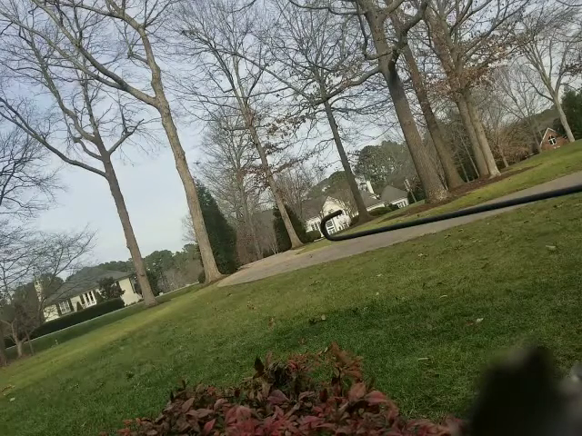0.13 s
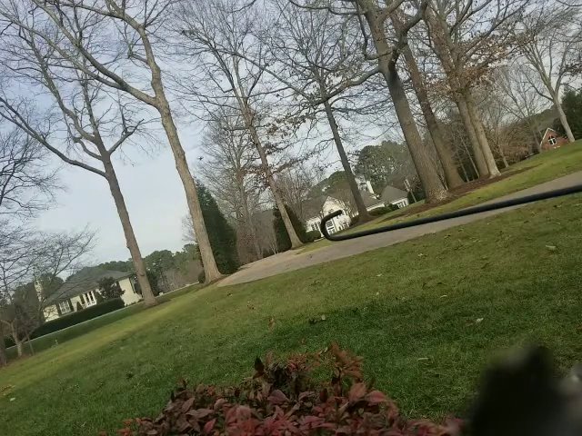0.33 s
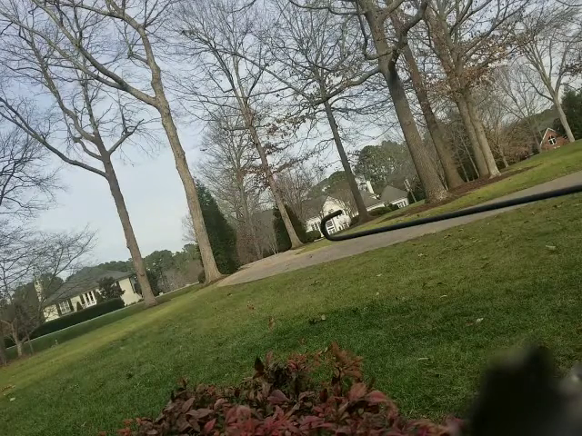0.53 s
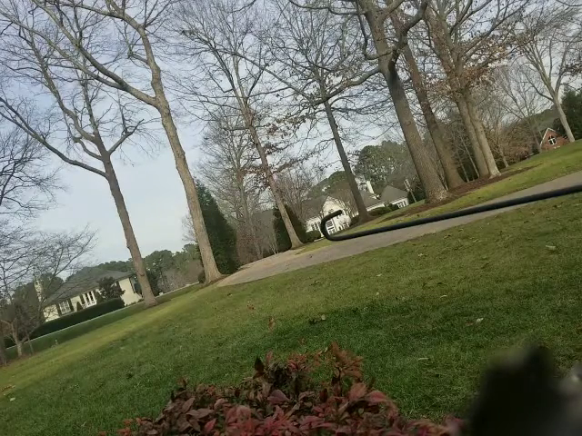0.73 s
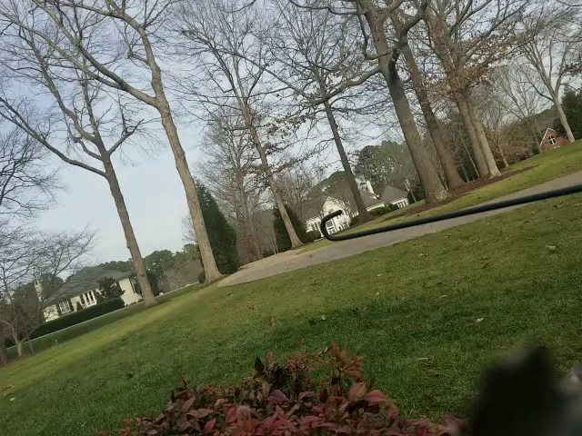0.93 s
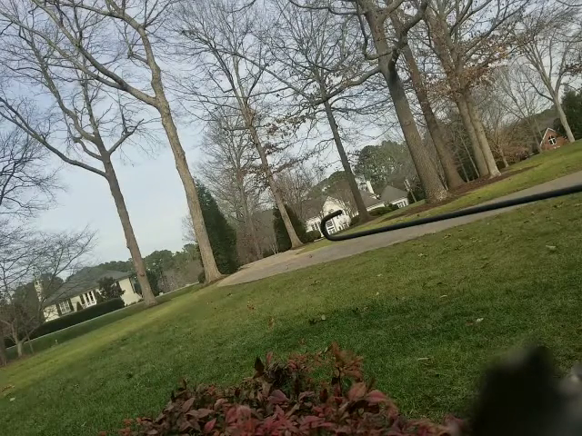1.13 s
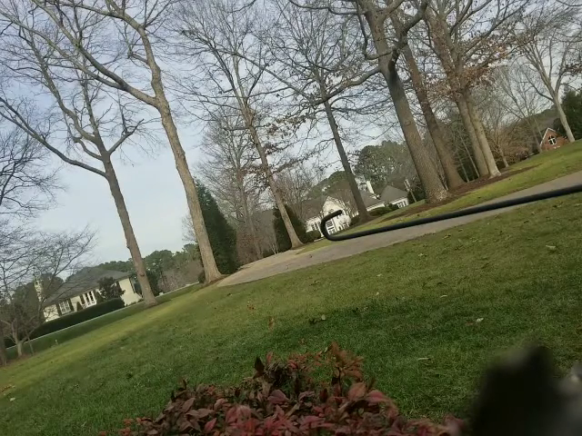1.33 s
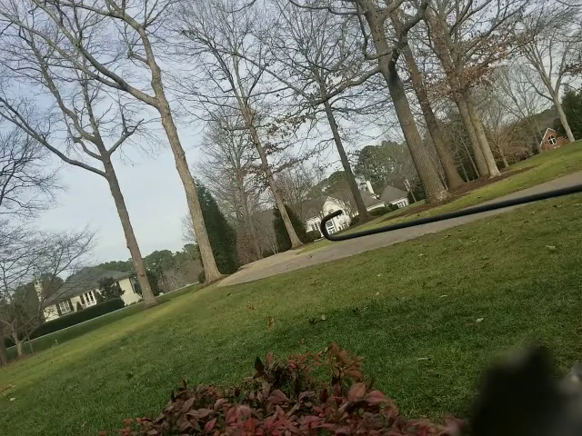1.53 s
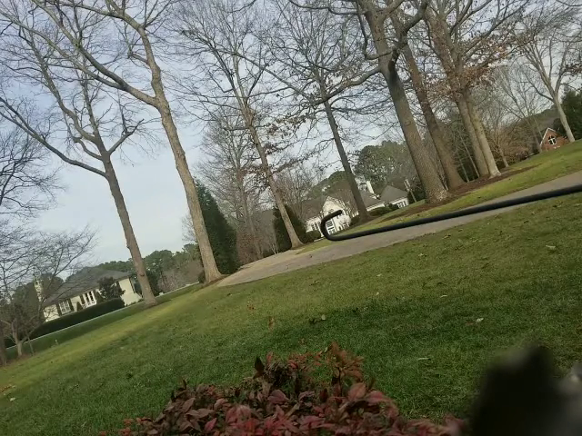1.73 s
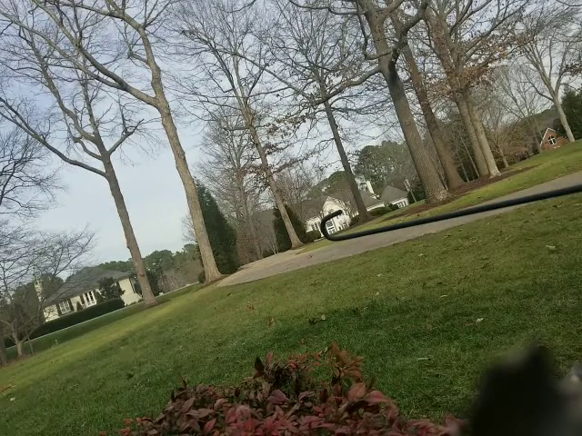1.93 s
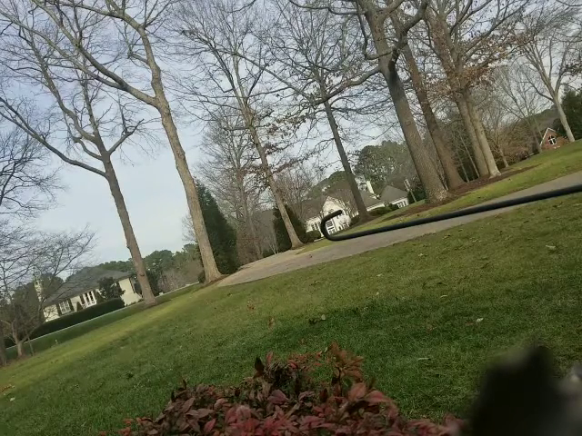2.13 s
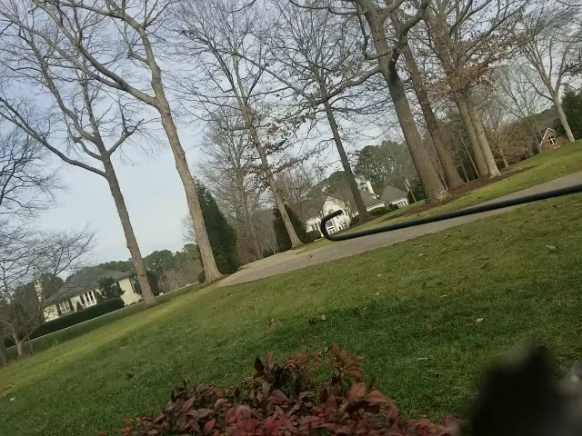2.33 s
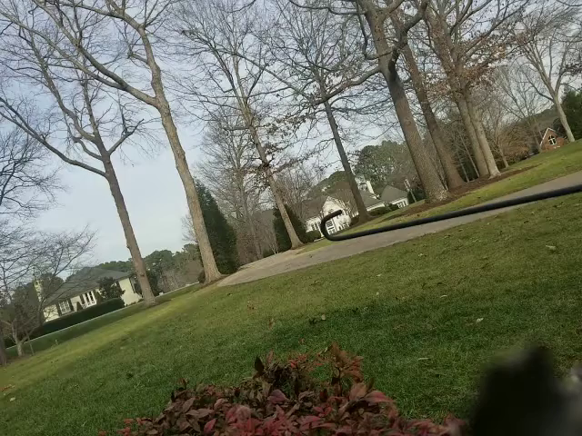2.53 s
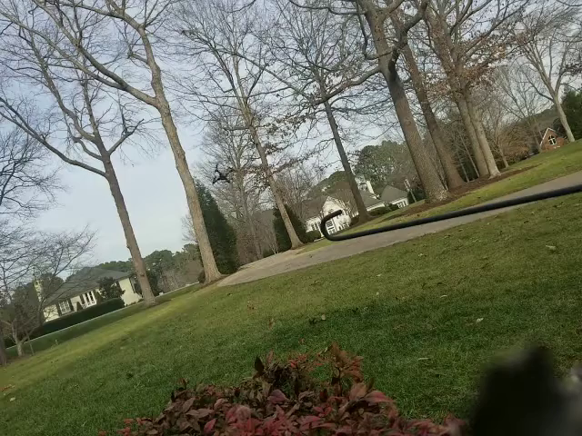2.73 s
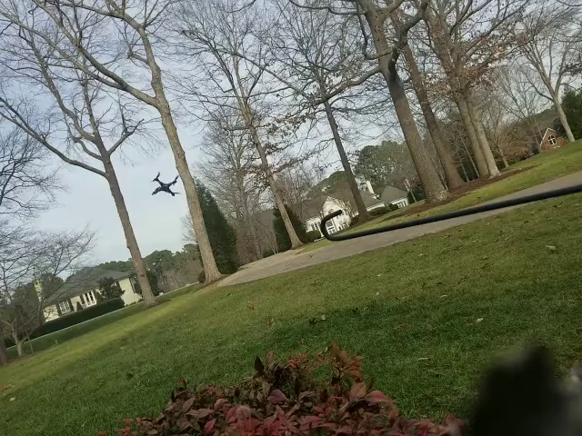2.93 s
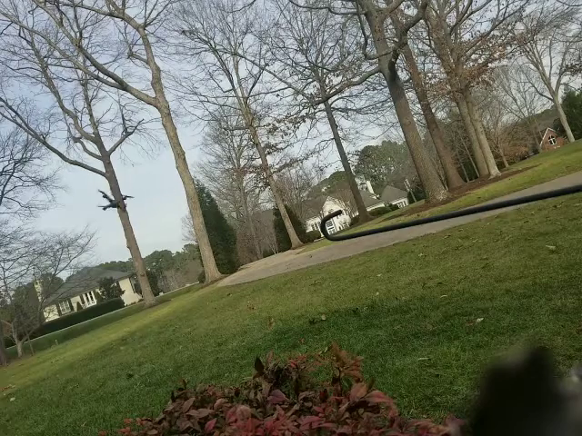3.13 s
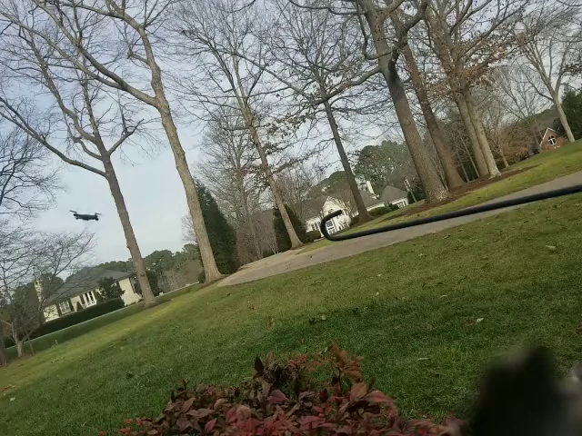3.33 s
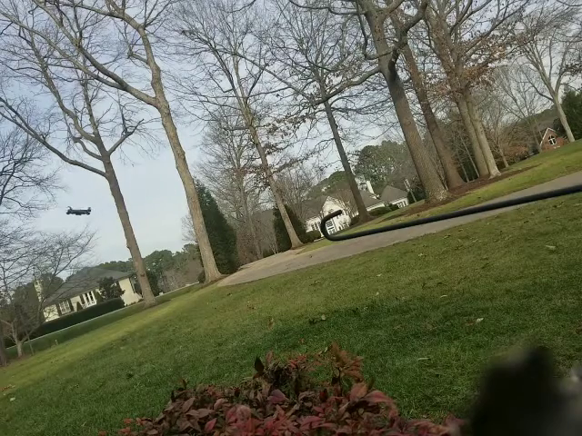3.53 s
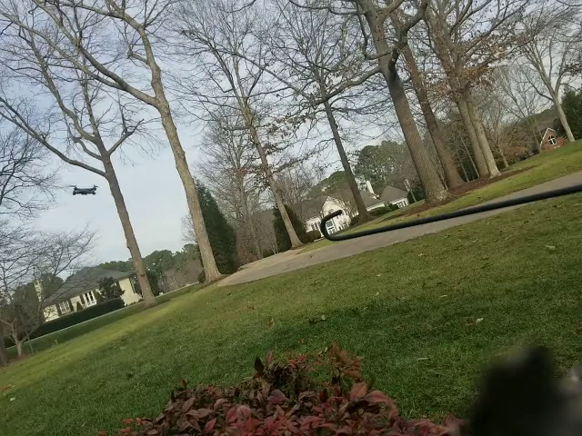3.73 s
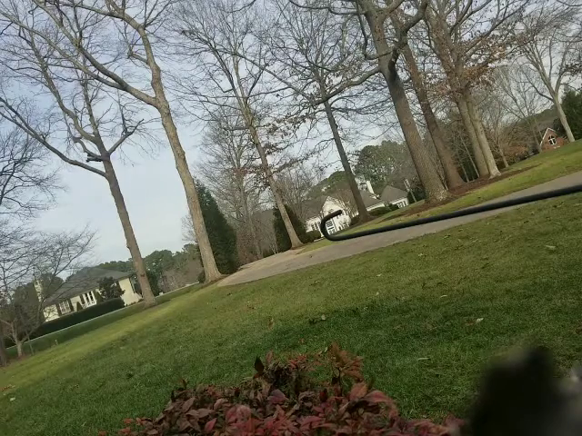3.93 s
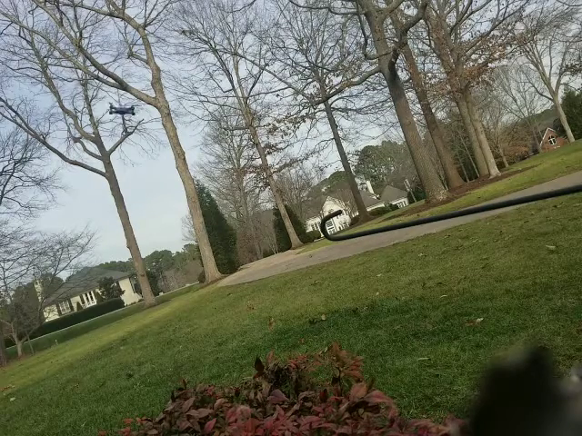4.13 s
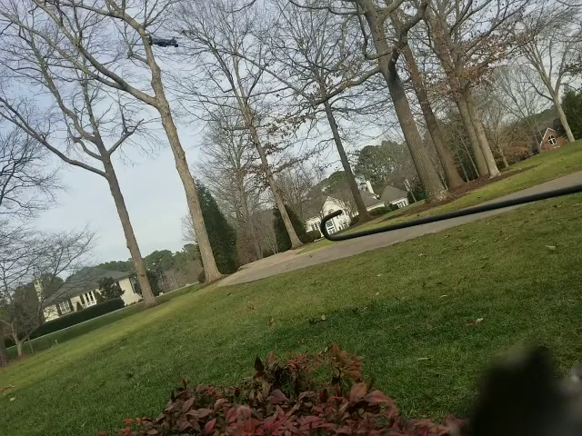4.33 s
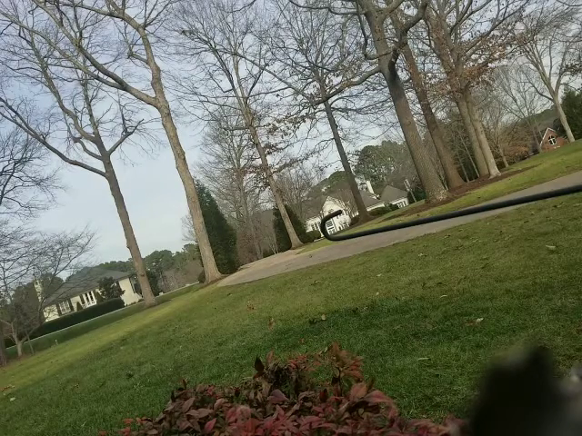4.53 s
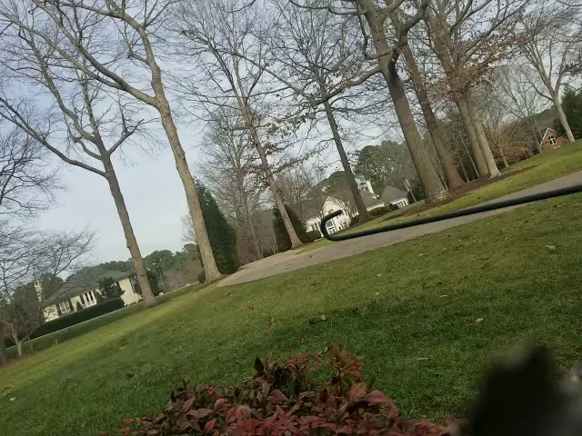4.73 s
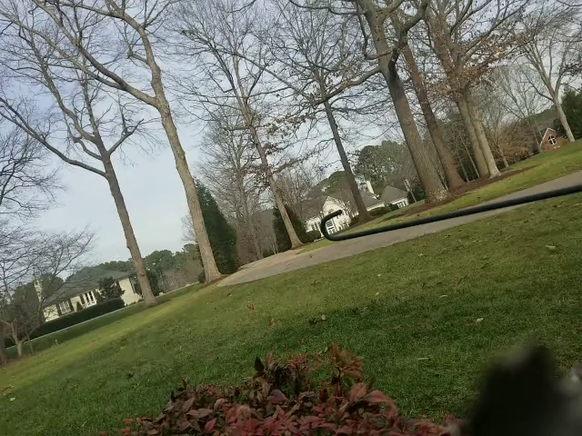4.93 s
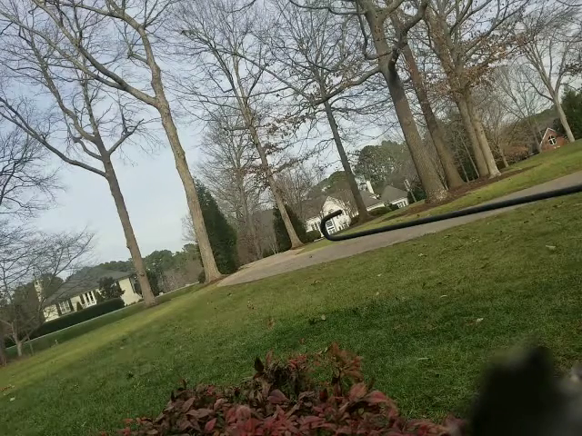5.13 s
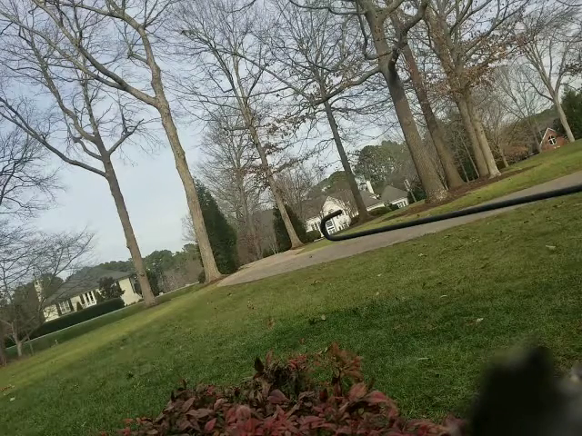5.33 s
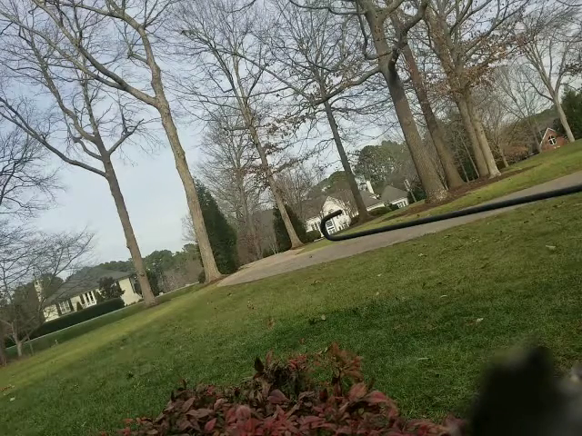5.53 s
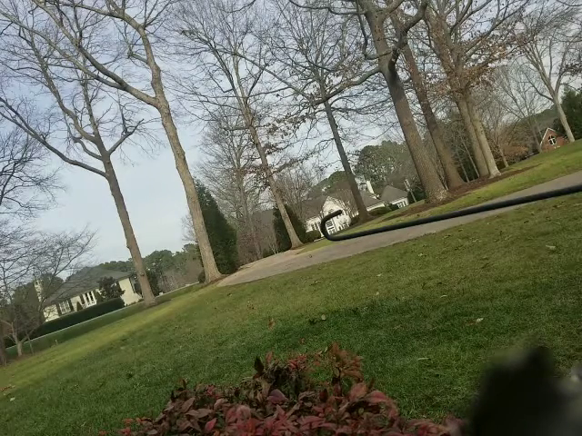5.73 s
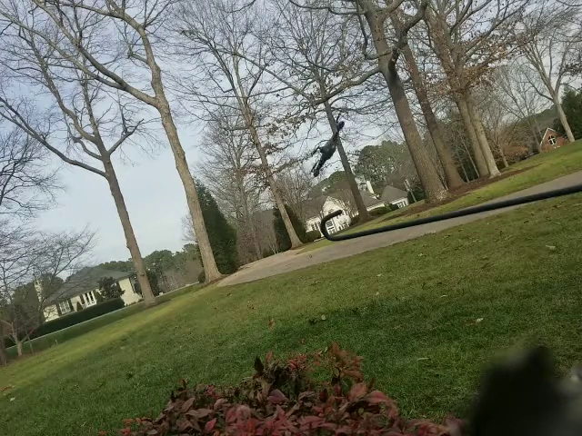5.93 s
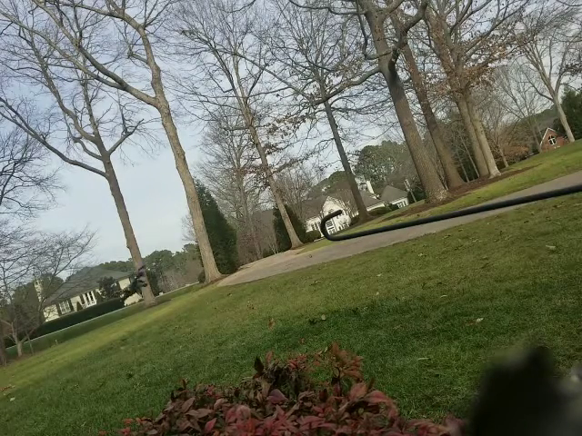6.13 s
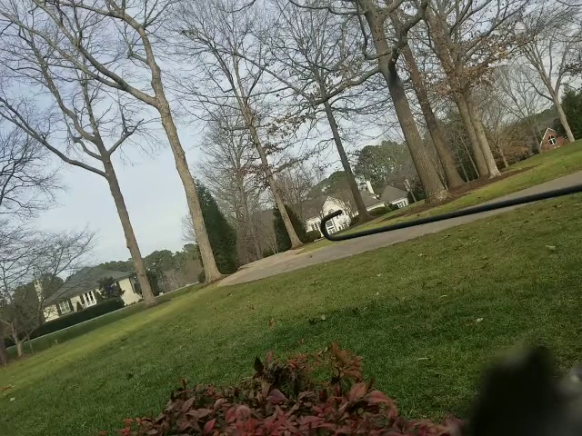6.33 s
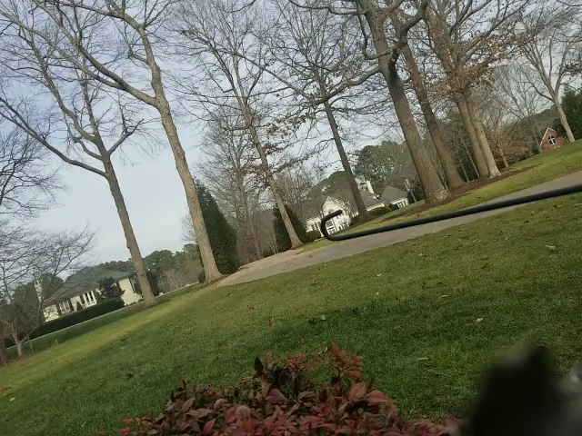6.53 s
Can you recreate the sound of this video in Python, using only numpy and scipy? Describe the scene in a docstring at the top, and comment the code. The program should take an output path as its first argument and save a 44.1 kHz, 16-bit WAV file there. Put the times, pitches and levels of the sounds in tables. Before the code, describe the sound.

High, buzzy whines from a little four-rotor drone swoop up and down over a lawn, growing closer and harsher, with distant low traffic beneath.

```python
"""Whines climbing and diving from four geared motors: a toy quadcopter swoops about a lawn, a few
metres from two microphones. Each gear pair is an oscillator at its tooth rate with sidebands and overtone.
Filtered noise makes the rattle, blade-tip hiss, downwash and panel buzz; blade-rate cosines make the hum.
The ground returns a delayed copy, trees and walls scatter the air noise, distant traffic rumbles below."""
import sys
import numpy as np
from scipy import signal
from scipy.fft import rfft, irfft
from scipy.io import wavfile
from scipy.ndimage import uniform_filter1d, map_coordinates

SR = 44100
rng = np.random.default_rng(int(sys.argv[2]) if len(sys.argv) > 2 else 0)


def wav_out(sig):
    """Save sig, one row per channel (or a flat mono array), as 16-bit PCM at SR to the path in sys.argv[1]."""
    wavfile.write(sys.argv[1], SR, np.round(np.clip(np.atleast_2d(sig).T, -1, 1) * 32767).astype(np.int16))


def elevation(decibels):
    """Turn decibel levels (scalar or array-like) into linear amplitude ratios."""
    levels = np.asarray(decibels, float)
    return 10 ** (levels / 20)


N = 294147
TIME_S = np.arange(N) / SR
FREQ_HZ = np.fft.rfftfreq(N, 1 / SR)
TEETH_PER_BLADE_PASS = 27


def unit(x):
    """Scale to rms 1."""
    return x / np.sqrt(np.mean(x ** 2))


def curves(table):
    """Columns of a (t/s, value, ..) table, interpolated at every sample."""
    t_s, *columns = np.transpose(table)
    return [np.interp(TIME_S, t_s, column) for column in columns]


def walk(rate_hz):
    """Smooth random walk about zero, changing about rate_hz times a second, rms 1."""
    width = max(int(SR / rate_hz), 1)
    smooth = uniform_filter1d(rng.standard_normal(N), width)
    return unit(uniform_filter1d(smooth, width))


def delay(x, ms):
    """Moving propagation delay: read the sound at interpolated places."""
    return map_coordinates(x, [np.arange(N) - ms * SR / 1000], order=3, mode="nearest")


def colour(x, spectrum, lo_hz=0., hi_hz=1e6, power=0.99):
    """Filter by (f/Hz, level/dB) points, dB scaled by power, between steep band edges."""
    hz, db = np.transpose(spectrum)
    f = FREQ_HZ + 1
    edges = 1 / np.sqrt((1 + (lo_hz / f) ** 16) * (1 + (f / hi_hz) ** 16))
    gain_db = power * np.interp(np.log(f), np.log(hz), db)
    return irfft(rfft(x) * elevation(gain_db) * edges, N)


def resonances(modes, lift_db=False):
    """Sum of resonance peaks over (f/Hz, width/Hz, level/dB) modes; lift_db: peaks above a flat 0 dB."""
    floor = 1 if lift_db else 0
    return floor + sum((elevation(db) - floor) / (1 + (2 * (FREQ_HZ - hz) / width) ** 2)
                       for hz, width, db in modes)


# airframe spectrum, before colour's power: f/Hz, level/dB
AIRFRAME = [(250, -14), (600, -16), (800, -18.5), (950, -19.5), (1800, -11), (3300, -4.5), (5400, -6.5),
            (7200, 8), (9400, -7), (12700, 1), (14500, -4)]
# plastic shell modes: f/Hz, width/Hz, lift/dB
SHELL_MODES = [(1156, 457, 12), (2197, 350, 4.5), (2600, 63, 4), (3400, 28, 2.5), (7060, 580, -2)]


def airframe(x, lo_hz=0., hi_hz=1e6):
    """The airframe colours the sound, and its plastic shell lifts the bands where it rings."""
    return irfft(rfft(colour(x, AIRFRAME, lo_hz, hi_hz)) * resonances(SHELL_MODES, lift_db=True), N)


# one speed curve per rotor: t/s, tooth rate f/Hz, level/dB re gear rattle before trim and colouring
ROTORS = [
    [(0, 2960, -16), (.1, 3200, -13), (.2, 3750, -10), (.27, 4100, -7), (.36, 4480, -2), (.52, 4680, 0),
     (.66, 4870, -4), (.8, 4945, -6), (1.2, 5050, -5), (1.57, 5270, -4), (1.63, 4750, -10), (1.8, 3250, -8),
     (1.9, 3150, -16), (2.12, 3200, -16), (2.18, 3330, -3), (2.24, 4250, 0), (2.29, 4530, -2),
     (2.38, 4640, -6), (2.5, 4707, -14), (2.68, 4780, -5), (2.81, 4840, 1), (2.9, 4893, 0),
     (3.02, 4917, -6), (3.15, 4910, -12), (3.4, 4930, -7), (3.52, 4990, -9), (3.65, 5130, -7),
     (3.76, 5160, -4), (4.1, 5190, -6), (4.36, 5240, -8), (4.5, 5300, -8), (4.62, 5326, -6.5),
     (4.9, 3212, -24), (5.1, 3200, -12), (5.18, 3380, -8), (5.23, 3800, -24), (5.4, 4800, -22),
     (5.55, 5050, -6), (5.7, 5132, -0.5), (6.1, 5096, -18), (6.67, 4663, -20)],
    [(0, 4730, -14), (.15, 4960, -7), (.34, 5050, -6), (.42, 5050, -14), (.6, 5060, -7), (.9, 4780, -5),
     (1.5, 4900, -7), (1.75, 4460, -25), (2.6, 4600, -25), (2.8, 4590, -7), (3.05, 4520, -9),
     (3.2, 4450, -20), (3.4, 4500, -16), (3.48, 4510, -4), (3.65, 4460, -8), (3.76, 4510, -3),
     (3.88, 4570, -1), (4.1, 4620, -5), (4.22, 4690, -8), (4.36, 4670, -7), (4.47, 4850, -5),
     (4.6, 4750, -20), (4.68, 4500, -6), (4.77, 4050, -2), (4.85, 3700, -8), (4.95, 3500, -20),
     (5.3, 4654, -9.5), (5.75, 4930, -1), (5.85, 4960, -4), (5.93, 4980, -15), (6.06, 5010, -6),
     (6.16, 4980, -16), (6.67, 4637, -22)],
    [(0, 3220, -22), (.18, 3500, -12), (.32, 3950, -8), (.7, 4330, -10), (.85, 4450, -20), (1.02, 4680, -9),
     (1.15, 4650, -10), (1.25, 4637, -6), (1.58, 4590, -12), (1.8, 3550, -10), (2.1, 3270, -20),
     (2.25, 3940, -12), (2.45, 4050, -20), (2.9, 4340, -9.5), (3.2, 4383, -18), (3.45, 4050, -14),
     (3.6, 3990, -9), (3.76, 3880, -10), (3.9, 3950, -22), (4.45, 4300, -14), (4.54, 4400, -3),
     (4.63, 4760, 0), (4.72, 4760, -2), (4.8, 4280, -2), (4.89, 3600, -14), (5.13, 1900, -10),
     (5.17, 2250, -2), (5.23, 2950, -2), (5.27, 3100, -10), (5.4, 3550, -11), (5.5, 3720, -5),
     (5.6, 3880, -1), (5.7, 3930, 0), (5.8, 4150, 1), (5.87, 4380, -2), (5.95, 4450, -5), (6.03, 4520, -9),
     (6.1, 4550, -22), (6.28, 4580, -20), (6.34, 4530, -3), (6.45, 4300, 2), (6.55, 4210, 2),
     (6.67, 4050, 1)],
    [(0, 5020, -22), (.6, 5190, -26), (1.45, 5535, -24), (1.75, 4860, -26), (2.4, 5900, -26),
     (2.55, 6030, -12), (2.7, 5860, -7), (2.8, 5800, -9), (2.86, 5570, -15), (2.93, 5700, -9),
     (3.02, 5920, -11), (3.08, 5800, -26), (3.5, 5264, -44), (4.58, 5640, -32), (5.1, 3330, -24),
     (5.4, 3205, -20), (5.55, 3400, -9), (5.7, 3700, -20), (5.8, 4050, -10), (5.85, 4000, -1),
     (5.91, 3800, -2), (5.97, 4000, -5), (6.05, 3800, -14), (6.13, 3800, -4), (6.22, 4250, -4),
     (6.27, 4350, -20), (6.67, 4250, -20)],
]
# whine sidebands one, two and three blade rates below the tooth tone:
# multiple of motor shaft rate, level/dB re whine
SIDEBANDS = [(24 / 3, -9), (25 / 3, -8), (26 / 3, -8)]
# fifth shaft order of each motor at cruise: level/dB re whine
FIFTH_ORDER_DB = [-8, -12, -12, -3]


def rotor(table, fifth_db, rattle_db):
    """Gear whine at the tooth rate; returns tone, blade phase and weight for sharing out the hum."""
    cruise_hz, chatter_below_hz, low_speed_hz = 5000, 3900, 4150
    hard_pull_hz_per_s, coast_hz_per_s = 3000, 5000
    pinion_teeth, trim_db = 9, 4.5
    hz, whine_db = curves(table)
    whine_db = whine_db + rattle_db
    hz = uniform_filter1d(hz, size=2200)  # inertia rounds each change of speed
    # slow or coasting gears lose load and chatter; slower falls stay loaded, climbs stay clean
    climb = np.gradient(hz) * SR / hard_pull_hz_per_s
    coast = np.maximum(-climb - coast_hz_per_s / hard_pull_hz_per_s, 0)
    slow = np.clip((chatter_below_hz - hz) / 500, 0, .7)
    slack = np.clip(slow - np.maximum(climb, 0) + coast, 0, .6)
    hz = hz * (1 + 0.00146 * walk(38.9) + 0.0297 * slack * walk(146.9))
    tooth = 2 * np.pi * np.cumsum(hz) / SR + 2 * np.pi * rng.random()

    wear = elevation(1.7 * walk(19)) + 0.43 * walk(1010)  # uneven teeth: a noisy skirt round the tone
    tone = np.cos(tooth)
    fifth_db = fifth_db + 8 * (hz - cruise_hz) / 1000  # +8 dB per kHz
    for order, db in SIDEBANDS + [(5, fifth_db)]:
        flicker_db = 2 * walk(8.6)
        tone = tone + elevation(db + flicker_db) * np.cos(order * tooth / pinion_teeth)
    # octave swells in climbs, more so from low speed, and blurs in hard pulls
    swell_db = 5 + 8 * np.maximum(low_speed_hz - hz, 0) / 1000
    octave_db = -15 + swell_db * np.clip(climb, 0, 1)
    blur_rad = .45 * np.clip(climb, 0, 3) * walk(350)
    tone = tone + elevation(octave_db) * np.cos(2 * tooth + blur_rad)

    # hum strongest near cruise: -9 dB per kHz away from it
    hum_weight = elevation(0.49 * whine_db - 9 * np.abs(hz - cruise_hz) / 1000)
    return elevation(whine_db + trim_db) * wear * tone, tooth / TEETH_PER_BLADE_PASS, hum_weight


# third rotor's undertone as it first spins up: t/s, level/dB re rattle
UNDERTONE = [(0, -7.5), (.2, -12), (.33, -18), (.45, -50), (6.67, -50)]


def undertone(blade_phase, rattle_db):
    """Subharmonic at half the tooth rate."""
    level_db = rattle_db + curves(UNDERTONE)[0]
    return elevation(level_db) * np.cos(blade_phase * TEETH_PER_BLADE_PASS / 2)


def air_noise(chop, rattle_db, wash_db, hiss_db):
    """Downwash, gear rattle and blade-tip hiss: noise bands pulsed by blade passes, fluttering."""
    gust_db = 0.33 * walk(1.4)
    layers = [(wash_db + 1.32 * walk(4.4), 230., 1000.),
              (rattle_db, 1020., 5500.),
              (hiss_db, 5500., 16000.)]
    out = 0
    for db, lo_hz, hi_hz in layers:
        flutter_db = gust_db + 1.3 * walk(35)
        noise = airframe(chop * rng.standard_normal(N), lo_hz, hi_hz)
        out = out + elevation(db + flutter_db) * unit(noise)
    return out


# rumble spectrum, before colour's power: f/Hz, level/dB
TRAFFIC = [(15, -29), (25, -9.5), (70, 5.5), (216, -10.5), (377, -19.5), (518, -19), (561, -47), (600, -60),
           (780, -73), (1320, -120)]


def traffic():
    """Low distant rumble: filtered noise, mostly alike at both microphones."""
    mid, side = (unit(colour(rng.standard_normal(N), TRAFFIC)) for _ in range(2))
    return elevation(-54) * (mid + elevation(-9.5) * side * np.array([[1], [-1]]))


# blade hum, loudest in hard turns: t/s, then level/dB re rattle of blade rate, 2nd and 3rd harmonic
# (each shared among the rotors)
HUM = [(0, -41, -23, -27.5), (2.3, -28, -22.5, -21.5), (2.7, -15.5, -9.5, -27), (3.25, -14, -13.5, -19),
       (3.4, -26, -28, -32), (4.2, -18.5, -24, -32), (4.62, -8, -20, -21), (4.85, -16.5, -28, -48),
       (5.3, -26.5, -27, -23), (5.7, -9, -32, -26), (6.1, -15, -21, -24), (6.35, -10.5, -18, -21),
       (6.67, -17.5, -14, -25)]


def blade_hum(blades, weights, rattle_db):
    """Blade-pass rate and two overtones, shared among the rotors by weight."""
    shares = np.array(weights) / np.sqrt(np.sum(np.square(weights), axis=0))
    gains = [elevation(rattle_db + db) for db in curves(HUM)]
    return sum(share * sum(gain * np.cos(k * phase) for k, gain in enumerate(gains, 1))
               for share, phase in zip(shares, blades))


# loose panel modes: f/Hz, width/Hz, level/dB
BUZZ_MODES = [(2647, 120, 3), (3310, 610, 3.5)]
# panel buzz, strongest while the motors run slow: t/s, level/dB re rattle
BUZZ = [(0, -39), (2.45, -40), (2.75, -31), (2.9, -9), (3.05, -4), (3.25, -28), (4.5, -11), (4.68, -5),
        (4.9, 0), (5.1, -1), (5.25, 2), (5.52, -1), (5.7, -6.5), (5.95, -10), (6.12, -3), (6.3, -8.5),
        (6.67, -20)]


def panel_buzz(rattle_db):
    """Loose panels: noise ringing in their modes, with a grainy level."""
    ring = irfft(rfft(rng.standard_normal(N)) * resonances(BUZZ_MODES), N)
    return elevation(rattle_db + curves(BUZZ)[0] + 1.3 * walk(32)) * unit(ring)


# craft bearing, smoothed in use: t/s, left-microphone lateness re right/ms
BEARING = [(0, -.043), (1.9, -.01), (2.55, .065), (3.35, -.15), (4.15, -.14), (4.5, -.08), (5, .16),
           (5.58, .345), (5.86, .3), (6.3, -.14), (6.67, -.29)]
# ground bounce, later when the craft is high, smoothed in use: t/s, mean lateness re direct/ms, level/dB
BOUNCE = [(0, 1.69, -3), (1, 2, -4.5), (1.85, 2.94, -5), (2.5, 2, -7), (3.2, 2.54, -7.5),
          (3.65, 2.42, -6.5), (4.05, 2.95, -16), (4.45, 3.8, -8.5), (6.15, 2.46, -44), (6.4, 1.55, 2),
          (6.67, 1.36, -22)]


def at_microphones(craft, scatter):
    """Direct path, ground bounce and scattered air noise at the left, then the right microphone."""
    swing_s = .25  # limits how fast the craft changes course
    lag_ms, bounce_ms, bounce_db = (uniform_filter1d(c, int(swing_s * SR), mode="nearest")
                                    for c in curves(BEARING) + curves(BOUNCE))
    out = []
    for side in (1, -1):
        heard = delay(craft, side * lag_ms / 2)
        heard = heard + elevation(bounce_db) * delay(heard, bounce_ms + side * .08)
        heard = heard + elevation(-5.5) * scatter()
        # camera body shades the far microphone, more so in the treble
        treble = colour(heard, [(100, 0), (10000, 0)], lo_hz=3500.0)
        level_db = side * (0.4 - 0.85 * lag_ms)
        treble_db = -side * 4.9 * lag_ms
        out.append(elevation(level_db) * (heard + (elevation(treble_db) - 1) * treble))
    return np.array(out)


# craft loudness as throttle and distance change: t/s, rattle level/dB,
# then downwash and blade-tip hiss level/dB re rattle, both trimmed per path
FLIGHT = [(0, -53, -8.5, -0.5), (1, -55, -27, 1.5), (1.7, -51, -13, 1), (2.05, -55, -21, -5.5),
          (2.13, -49.5, -13, -4), (2.27, -47, -9.5, 1), (2.41, -45.5, -8.5, -0.5), (2.8, -42.5, -5.5, -0.5),
          (3.25, -41.5, -7.5, 0.5), (3.36, -43, -10, 3.5), (3.9, -43.5, -20.5, 4), (4.5, -39.5, -17, 1),
          (4.77, -37, -4, 2), (4.87, -37, -5, -1.5), (5.09, -45, -18.5, -6.5), (5.19, -39.5, -47, -1),
          (5.35, -37, -10, 1.5), (5.9, -35.5, -14.5, 4.5), (6.3, -38.5, -10.5, 1), (6.67, -43, -8, 0)]


def scene():
    """Sum the craft's sources, carry them to both microphones and add the traffic."""
    rattle_db, wash_db, hiss_db = curves(FLIGHT)
    wash_db, hiss_db = rattle_db + wash_db, rattle_db + hiss_db
    rotors = [rotor(table, db, rattle_db) for table, db in zip(ROTORS, FIFTH_ORDER_DB)]
    whines, blades, weights = zip(*rotors)
    # blade passes pulse the air noise
    chop = 1 + 0.034 * sum(np.cos(phase) + np.cos(phase / 2) for phase in blades)

    craft = airframe(sum(whines)) + undertone(blades[2], rattle_db)
    craft = craft + air_noise(chop, rattle_db, wash_db - 4.5, hiss_db - 2.2)
    craft = craft + blade_hum(blades, weights, rattle_db) + panel_buzz(rattle_db)

    def scatter():
        """Air noise off trees and walls, drawn afresh for each microphone."""
        return air_noise(chop, rattle_db, wash_db - 0.5, hiss_db + 2.0)

    return at_microphones(craft, scatter) + traffic()


def roll_off(x):
    """The treble ends steeply here."""
    return signal.sosfilt(signal.butter(12, 14560, fs=SR, output="sos"), x)


# microphone port mismatch: f/Hz, left-minus-right level/dB
PORTS = [(2000, 0), (5500, 2), (7000, 2), (8000, 3.5), (9000, -6), (12000, -1.5), (14000, 0.5)]


def record(dry):
    """The two microphone ports colour the treble differently, half the mismatch each way."""
    mix = np.array([colour(x, PORTS, power=side / 2) for x, side in zip(dry, (1, -1))])
    return roll_off(mix)


dry = scene()
out = record(dry)
wav_out(out)
```